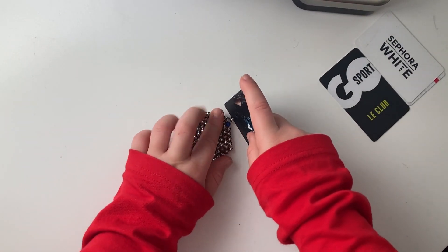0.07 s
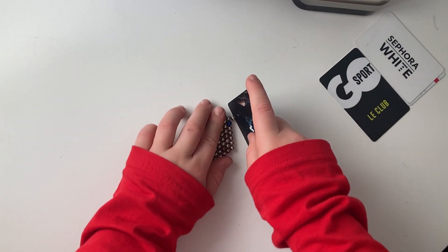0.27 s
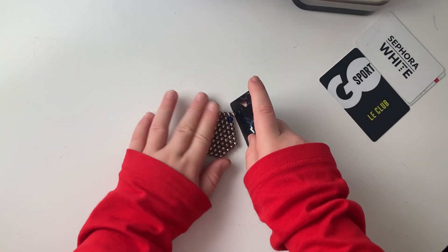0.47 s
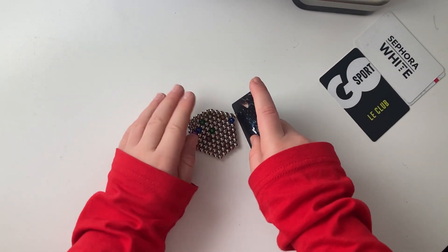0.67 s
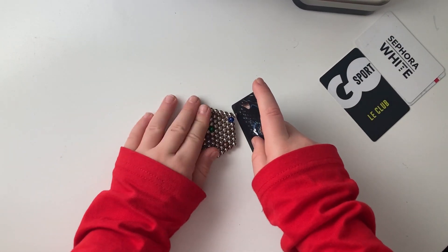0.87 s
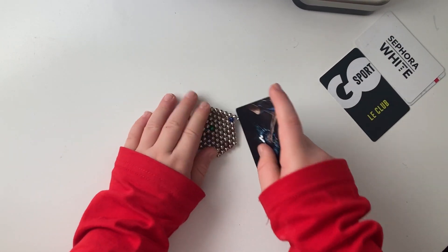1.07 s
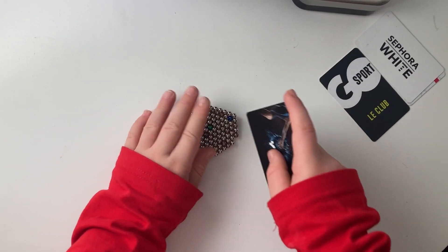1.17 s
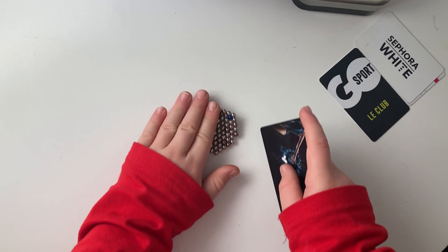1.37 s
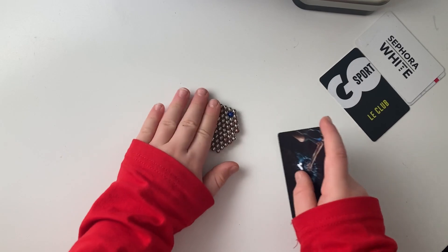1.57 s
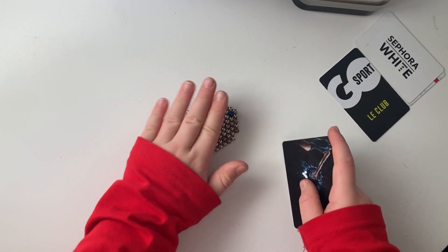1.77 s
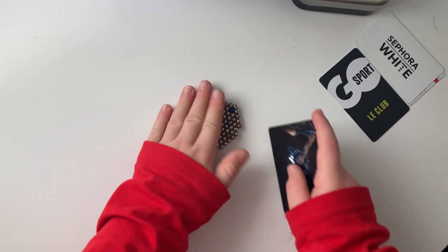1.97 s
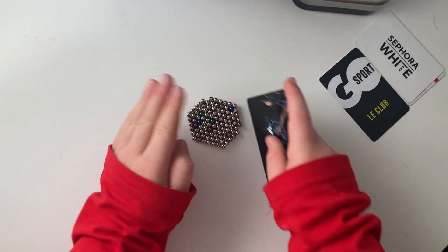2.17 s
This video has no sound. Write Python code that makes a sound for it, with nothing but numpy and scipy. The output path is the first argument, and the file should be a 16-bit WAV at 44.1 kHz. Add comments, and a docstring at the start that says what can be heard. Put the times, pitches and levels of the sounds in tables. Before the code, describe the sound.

Small steel magnetic balls click and snap together while a plastic card knocks on a table

```python
"""A table top in a small room: a hand pushes a flat patch of small steel magnetic balls and a plastic card about.
The patch scrapes along: grains of friction feed the table's ringing tones, and the same noise swells briefly
just before the two hard blows. Blows of card and patch ring the table and make it thud, the card answers with
short pings, and balls snap together in bright bursts of ticks. Fading noise gives the echoes, over faint
room tone. Two microphones close together hear it from above."""
import sys
import numpy as np
from scipy import signal
from scipy.fft import rfft, irfft, next_fast_len
from scipy.io import wavfile
from scipy.ndimage import uniform_filter1d

SR = 44100
rng = np.random.default_rng(int(sys.argv[2]) if len(sys.argv) > 2 else 0)


def amp(db):
    return 10 ** (np.asarray(db, float) / 20)


def write(x):
    x = np.atleast_2d(x).T
    wavfile.write(sys.argv[1], SR, np.round(np.clip(x, -1, 1) * 32767).astype(np.int16))


N = 97328  # samples, about 2.2 s

# High ringing tones of the table. Each row: pitch in Hz, strength in dB, time to fade by 60 dB in seconds.
TABLE_RING = [(1007, 10, 0.013), (1288, 0, 0.056), (1714.5, 1.5, 0.032), (1850, 3, 0.04), (2200, 1.5, .03),
              (2368, 9, 0.03), (2701, 5, 0.027), (2920, -2, 0.048), (3570, 3, 0.016), (3883, 2, 0.039),
              (4404, -5.5, 0.054)]
# Lower tones of the table, heard as a thud. Each row: pitch in Hz, strength in dB, time to fade by 60 dB in seconds.
TABLE_THUD = [(219.3, -10.5, 0.12), (281.5, -8, 0.1), (342, 3.5, 0.041), (401.3, -3, 0.053),
              (484, -3.5, 0.039), (649, 2.5, 0.034), (762, 3.5, 0.022)]


def unit(x):
    """Scale x to an average (rms) level of 1."""
    return x / np.sqrt(np.mean(x ** 2) + 1e-30)


def colour(x, points):
    """Make some pitches louder or softer, following (Hz, dB) points."""
    hz, db = np.array(points, float).T
    size = next_fast_len(x.shape[-1] + 2048)
    f = np.arange(size // 2 + 1) * SR / size + 1  # the 1 avoids log(0)
    gain = amp(np.interp(np.log(f), np.log(hz), db))
    return irfft(rfft(x, size) * gain, size)[..., :x.shape[-1]]


def ring(modes, secs, rise_s=0.00021, scatter_db=1):
    """One blow on an object: each of its tones (modes) fades by itself, a little off in pitch and strength."""
    detune = 0.023  # typical pitch error, as a share of the pitch
    t = np.arange(int(secs * SR)) / SR
    modes = np.array(modes, float)
    chance = rng.standard_normal((len(modes), 3))
    hz = modes[:, :1] * (1 + detune * chance[:, :1])
    gain = amp(modes[:, 1:2] + scatter_db * chance[:, 1:2]) * np.sign(chance[:, 2:])
    fade = np.exp(-np.log(1000) * t / modes[:, 2:])
    tones = (gain * np.sin(2 * np.pi * hz * t) * fade).sum(0)
    return tones * (1 - np.exp(-(t / rise_s) ** 2))


def burst(secs):
    """Things that meet bounce: a quick fading run of contacts, each a single click."""
    contacts_per_s, scatter_db, rebound_db = 2100, 5.5, -6  # rebound: later contacts against the first
    chance = rng.random((40, 3))
    at = np.cumsum(-np.log(1 - chance[:, 0])) / contacts_per_s  # random gaps
    at -= at[0]
    gain = np.exp(-(at / max(secs, 1e-4)) ** 2)
    gain *= amp(scatter_db * 2 * (chance[:, 1] - .5)) * np.sign(chance[:, 2] - .5)
    gain[1:] *= amp(rebound_db)
    clicks = np.zeros(int(.06 * SR))
    np.add.at(clicks, np.minimum(at * SR, len(clicks) - 1).astype(int), gain)
    return clicks


def crack(clicks, points, t60):
    """The modes too dense to count: coloured noise that leaps at each contact and dies quickly."""
    fade = np.exp(-2 * np.log(1000) * np.arange(2048) / SR / t60)  # 2: this is power
    power = np.abs(signal.fftconvolve(clicks ** 2, fade))
    return colour(rng.standard_normal(len(power)), points) * np.sqrt(power)


def add(out, start, db, x):
    """Place x at start (seconds) with its smoothed peak at db."""
    peak = np.sqrt(uniform_filter1d(x ** 2, size=256).max())
    i = int(start * SR)
    out[i:i + len(x)] += (x * amp(db) / peak)[:N - i]


def air():
    """Faint steady room tone: coloured noise, most alike left and right in the high treble, least near 3 kHz."""
    # Colour of the room tone. Each row: pitch in Hz, relative level in dB.
    air_colour = [(15, -73), (25, -28), (39, -8.5), (63, -14.5), (102, -24), (503, -41.5), (2220, -47),
                  (5280, -50.5), (9570, -42.5), (16000, -56)]
    level_db = -69.5  # of the part both sides share
    mid, side = colour(rng.standard_normal((2, N)), air_colour)
    side = colour(side, [(100, -1.5), (600, -4.5), (3000, 6.5), (8000, -11)])
    return amp(level_db) * (mid + side * np.array([[1], [-1]])) / np.std(mid)


def wander(x):
    """Read x at a slowly changing pace: its tones drift as the hand's pressure shifts."""
    drift, drifts_per_s = 0.045, 6  # drift: scale of the change, as a share of the pace
    hold = int(SR / drifts_per_s)
    steps = np.repeat(rng.standard_normal(N // 1000 + 1), hold)[:N]
    pace = uniform_filter1d(steps, hold)
    return np.interp(np.cumsum(1 + drift * (pace - pace.mean())), np.arange(N), x)


def scrape():
    """Dense uneven grains of friction feed the table's modes and a treble hiss."""
    # Level curves of the noise: scraping, and short swells of noise just before the two hard blows.
    # Each curve is a list of rows. Each row: time in seconds, level of the ring in dB, of the thud band in dB,
    # of the treble in dB; at the start the treble is the fading tail of a ball snap.
    curves = [
        [(0.0, -73, -68.5, -61.5), (.045, -65, -69, -87), (0.12, -57, -63.5, -87), (0.248, -59, -61, -81),
         (0.33, -60.5, -66, -87), (0.398, -66, -70.5, -104), (0.45, -56, -61, -65), (0.538, -70, -89, -91),
         (0.6, -83, -63, -86)],
        [(0.8, -74, -78, -88.5), (0.886, -72, -78.5, -86), (0.95, -81.5, -65, -74), (1.006, -66, -78, -82.5),
         (1.048, -46, -63.5, -67), (1.13, -59.5, -58.5, -80.5)],
        [(1.2, -63, -62, -80.5), (1.278, -68.5, -73, -101.5), (1.396, -59, -60, -55.5),
         (1.44, -47.5, -50.5, -79.5)],
        [(1.55, -66, -65, -76), (1.662, -58.5, -59.5, -69), (1.8, -81, -79, -91.5)],
        [(1.93, -54, -58.5, -56), (1.984, -58, -55, -55), (2.056, -79.5, -77, -79), (2.12, -85.5, -101, -93)],
        [(.76, -77, -80, -87), (.784, -40, -58, -52)],
        [(1.805, -73, -84.5, -68.5), (1.832, -34, -59, -45.5)],
    ]
    # The band that sliding brings out: pitch in Hz, strength in dB, time to fade by 60 dB in seconds.
    rub = (2310, 13.4, 0.023)
    hiss = [(5300, 5, 0.004), (7490, -3.5, 0.0039), (9200, -5, 0.0046), (14100, -8, .002)]
    grains_per_s, grain_scatter = 900, 5  # more scatter: rarer, stronger grains stand out
    t = np.arange(N) / SR
    out = np.zeros((3, N))
    for k, modes in enumerate((TABLE_RING + [rub], TABLE_THUD, hiss)):
        chance = rng.random((N, 3))
        strength = (1 - chance[:, 1]) ** (-grain_scatter / 20) * np.sign(chance[:, 2] - .5)
        grains = (chance[:, 0] < grains_per_s / SR) * strength
        damped = [(hz, db, 0.36 * t60) for hz, db, t60 in modes]  # each tone fades sooner than listed
        rubbed = signal.fftconvolve(grains, ring(damped, .08, scatter_db=0.0))[:N]
        rubbed = unit(wander(rubbed))
        for curve in curves:
            rows = np.array(curve)
            begun, left = t - rows[0, 0] + .01, rows[-1, 0] - t + .002
            fade = np.clip(np.minimum(begun, left) / .006, 0, 1)
            out[k] += rubbed * fade * amp(np.interp(t, rows[:, 0], rows[:, 1 + k]))
    return out.sum(0)


def echoes():
    """What the walls return: two partly alike noise tails, each band fading at its own pace."""
    # Bands of the room. Each row: centre in Hz, time to fade by 60 dB in seconds, relative level in dB,
    # likeness of left and right from 0 to 1.
    bands = [(103, 0.28, -12.5, 0.84), (268, 0.23, -6, 0.99), (552, 0.18, -3, 0.1), (1320, 0.3, -5.5, 0),
             (2830, 0.26, -4, 0), (4670, 0.29, -4, 0.53), (7000, .24, -13, 0.1), (10900, 0.21, -10.5, 1),
             (14850, 0.19, -15, 1)]
    t = np.arange(int(.5 * SR)) / SR
    f = np.log(np.arange(len(t) // 2 + 1) * SR / len(t) + 1)
    centres = np.log(np.array(bands)[:, 0])
    tail = 0
    for k, (hz, t60, db, like) in enumerate(bands):
        share = np.sqrt(np.interp(f, centres, np.arange(len(bands)) == k))
        mid, side = irfft(rfft(rng.standard_normal((2, len(t)))) * share, len(t))
        pair = np.sqrt(1 + like) * mid + np.sqrt(1 - min(like, 1)) * side * np.array([[1], [-1]])
        rise = np.clip((t - 0.00075) / 0.0015, 0, 1)  # seconds: the first echo comes a little late
        fade = np.exp(-np.log(1000) * t / t60) * rise
        tail = tail + amp(db) * pair * fade / np.sqrt(np.sum(fade ** 2))
    return tail


def room(x):
    """The pieces move about, so each moment has echoes of its own."""
    # Colour of what the room returns. Each row: pitch in Hz, level in dB.
    echo_colour = [(1550, 1), (1830, 4), (2450, -3), (2930, 4), (3450, 1), (3930, -0.5), (5100, -2)]
    spot_s = .16  # seconds from one set of echoes to the next
    t = np.arange(N) / SR
    out = np.zeros((2, N))
    x = colour(x, [(1200, 0)] + echo_colour + [(7000, 0.0033)])
    for s in np.arange(0, t[-1] + spot_s, spot_s):
        a, b = max(int((s - spot_s) * SR), 0), min(int((s + spot_s) * SR), N)
        window = np.sqrt(np.clip(1 - np.abs(t - s) / spot_s, 0, 1))  # neighbours overlap
        moment = (x * window)[None, a:b]
        returned = signal.fftconvolve(moment, echoes(), axes=1)[:, :N - a]
        out[:, a:a + returned.shape[1]] += returned
    return out


def knocks():
    """Blows ring the table's high modes at once with a clack; thud and boom swell after the contact."""
    # Knocks on the table. Each row: start in seconds, level of the ring in dB, of the thud in dB,
    # of the deep boom in dB, burst length in seconds.
    blows = [(0.071, -57, -53.5, -65, 0.014), (.167, -50.5, -50.5, -64, 0.0048),
             (0.201, -46.5, -51, -70, 0.001), (0.358, -53, -50.5, -60.5, 0.003),
             (0.441, -53, -50.5, -82, 0.0038), (0.46, -46.5, -51, -64, 0.0031),
             (0.475, -40.5, -43, -57.5, 0.0043), (0.7831, -35, -41, -52.5, 0.0029),
             (0.845, -38.5, -50, -75.5, 0.0025), (0.909, -43, -46.5, -78, 0.0098),
             (1.0232, -40, -62, -77.5, 0.0042), (1.051, -45, -44.5, -61, 0.0013),
             (1.0608, -45.5, -45, -66, .002), (1.0688, -40, -41, -62, 0.0073),
             (1.0782, -35.5, -41.5, -64, 0.0012), (1.101, -45, -60.5, -73, 0.0025),
             (1.137, -39, -36, -70, 0.0032), (1.144, -37, -52, -81.5, 0.001),
             (1.374, -39.5, -49.5, -64.5, 0.0037), (1.4423, -31, -32.5, -62, 0.006),
             (1.4457, -24.5, -41.5, -37.5, 0.0026), (1.646, -59, -49.5, -69.5, 0.0064),
             (1.678, -50, -50, -61.5, 0.0016), (1.8311, -23.5, -35.5, -30, 0.0062),
             (1.99, -45.5, -48.5, -59.5, 0.0048), (2.001, -38.5, -54.5, -66.5, 0.0026)]
    # Deepest tones of the table. Each row: pitch in Hz, strength in dB, time to fade by 60 dB in seconds.
    boom = [(107, -7.5, 0.1), (122.3, -4.5, .08), (137, -7.5, 0.08)]
    # Colour of the noisy clack. Each row: pitch in Hz, relative level in dB.
    clack_colour = [(500, -12), (1000, 3.5), (1700, -12), (2500, -6), (3900, -2), (5500, -1), (7000, -25.5)]
    clack_db, clack_t60_s = -1, 0.019  # clack_db: against the ring
    thud_rise_s, boom_rise_s = 0.0042, 0.018
    out = np.zeros(N)
    for start, db, thud_db, boom_db, secs in blows:
        add(out, start, db, ring(TABLE_RING, 0.13, secs / 2))  # a longer burst rises more slowly
        add(out, start, db + clack_db, crack(burst(secs), clack_colour, clack_t60_s))
        add(out, start, thud_db, ring(TABLE_THUD, 0.11, thud_rise_s))
        add(out, start, boom_db, ring(boom, 0.19, boom_rise_s, scatter_db=1.85))
    return out


def pings():
    """The card's edge sounds a brief focused note and one overtone."""
    # Pings of the card, pitch set by the grip. Each row: start in seconds, level in dB, pitch in Hz.
    notes = [(.2025, -43, 2450), (.4775, -38, 2550), (.7848, -27, 2572), (.847, -48.5, 2840),
             (.912, -42, 2557), (1.0255, -39, 1880), (1.0505, -46.5, 2400), (1.137, -38, 2405),
             (1.1445, -31, 2420), (1.376, -40, 1780), (1.447, -25.5, 2418), (1.680, -42, 2354),
             (1.8335, -22, 2415), (2.002, -37.5, 2590)]
    t60_s, rise_s = 0.024, 0.00091
    overtone, overtone_db = 1.9, -16.5  # pitch as a multiple of the note, strength against it
    out = np.zeros(N)
    for start, db, hz in notes:
        modes = [(hz, 0, t60_s), (overtone * hz, overtone_db, 0.69 * t60_s)]
        add(out, start, db, ring(modes, .04, rise_s, scatter_db=3.5))
    return out


def snaps():
    """Each contact of steel balls is a very short bright ring, with a splash of noise and a top ring."""
    # Balls snapping. Each row: start in seconds, level in dB, pitch of the ring in Hz,
    # level of the top ring in dB, burst length in seconds.
    hits = [(0.203, -57.5, 6660, -80, 0.002), (0.465, -56, 6440, -72.5, 0.0079),
            (.477, -40.5, 8160, -50, 0.0047), (0.7847, -38, 7000, -48, 0.0034),
            (0.845, -41, 6470, -73.5, 0.0073), (0.92, -50.5, 7240, -75.5, 0.004),
            (1.024, -28, 8960, -24.5, 0.004), (1.038, -40.5, 8800, -45, 0.0025),
            (1.0772, -34, 7800, -48, .005), (1.101, -43, 8320, -56.5, 0.0049),
            (1.1357, -18, 9700, -22.5, 0.00024), (1.137, -22, 10300, -20.5, 0.0066),
            (1.378, -35.5, 7000, -51.5, 0.002), (1.4398, -31.5, 8740, -34.5, 0.014),
            (1.4455, -19.5, 7850, -32, 0.0061), (1.8331, -11.5, 8280, -29, 0.0036),
            (2.002, -35, 6840, -59, 0.0036)]
    # Colour of the noisy splash. Each row: pitch in Hz, relative level in dB.
    splash_colour = [(3000, -10), (5500, -4.5), (7000, -2.5), (9500, 7.5), (11500, -8), (13000, -26)]
    splash_db, splash_t60_s = -6.5, 0.017  # splash_db: against the ring
    top = [(13000, -2, .002), (13150, 0, 0.00077), (15500, -2, .002)]  # Hz, dB, seconds to fade by 60 dB
    out = np.zeros(N)
    for start, db, hz, top_db, secs in hits:
        clicks = burst(secs)
        tick = [(hz, 0, 0.0029), (0.797 * hz, -7, .003), (1.176 * hz, -6, .003)]
        add(out, start, db, signal.fftconvolve(clicks, ring(tick, .01)))
        add(out, start, db + splash_db, crack(clicks, splash_colour, splash_t60_s))
        add(out, start, top_db, signal.fftconvolve(clicks, ring(top, .01)))
    return out


def scene():
    """All sources, heard directly and through the room, over the room tone."""
    ping_room_db = -7  # the card faces the microphones, the walls get less of it
    wide = scrape() + knocks() + snaps()
    ping = pings()
    return wide + ping + room(wide + amp(ping_room_db) * ping) + air()


def top_cut(x):
    """Nothing passes above the cut-off."""
    return signal.sosfilt(signal.butter(12, 17160, fs=SR, output="sos"), x)


def record(dry):
    """The two microphones differ in phase and level by pitch, then share one colour."""
    # Between the microphones. Each row: pitch in Hz, phase by which left leads in radians,
    # left minus right in dB.
    ports = [(0, 0, 2.5), (380, -.7, 3), (860, -2.1, 1), (1890, -.9, 0), (2580, .27, .3), (5550, 3.14, .3),
             (8600, 6.28, 0), (11900, 9.42, 0), (15300, 12.57, 0), (17000, 14.2, 0)]
    # Colour of the microphones. Each row: pitch in Hz, level in dB.
    mic_colour = [(25, -16.5), (60, -2.5), (5500, -3.5), (10500, -8), (12000, -2.5), (15900, -7),
                  (16250, -28.5), (17000, -29)]
    hz, lead, level_db = np.array(ports).T
    size = next_fast_len(N + 2048)
    f = np.arange(size // 2 + 1) * SR / size
    # half of the difference goes to the left, the opposite half to the right
    half = amp(np.interp(f, hz, level_db) / 2) * np.exp(.5j * np.interp(f, hz, lead))
    heard = irfft(rfft(dry, size) * np.array([half, 1 / half]), size)[:, :N]
    return top_cut(colour(heard, mic_colour))


dry = scene()
out = record(dry)
write(out)
```